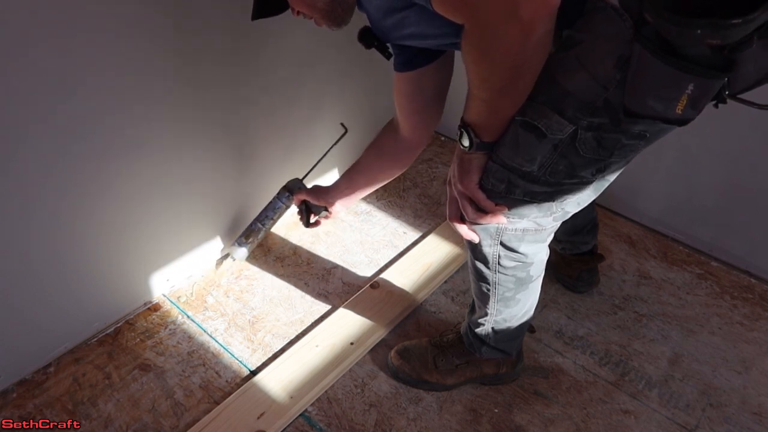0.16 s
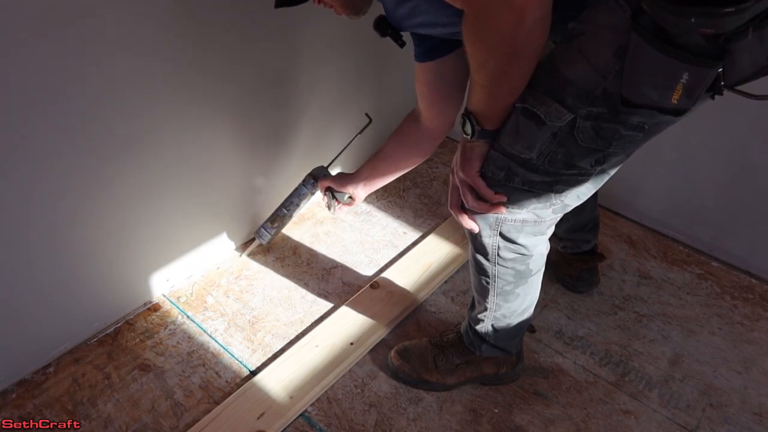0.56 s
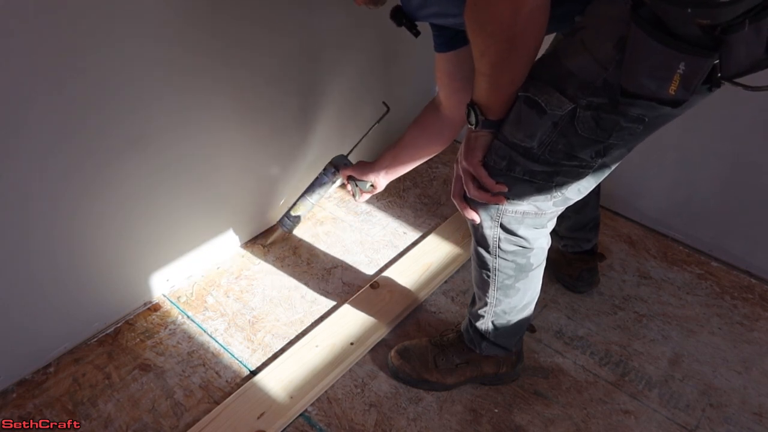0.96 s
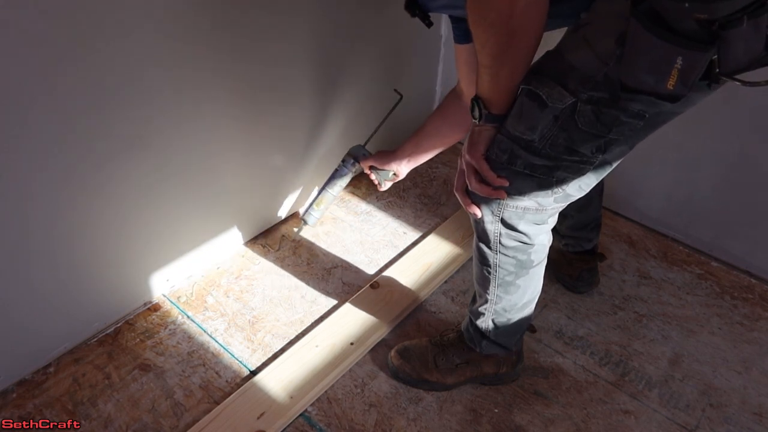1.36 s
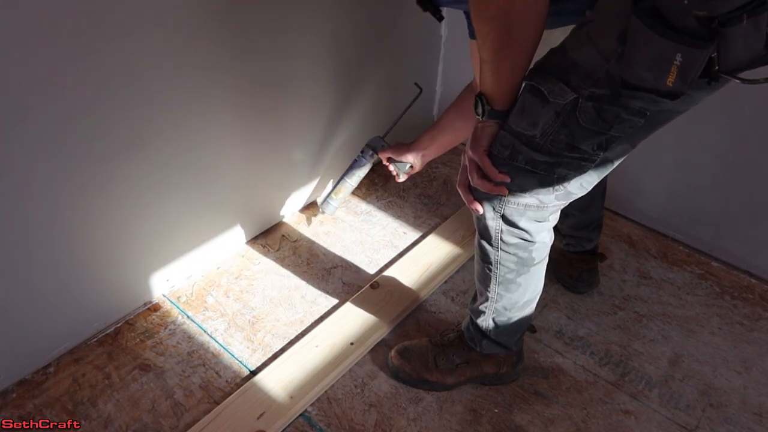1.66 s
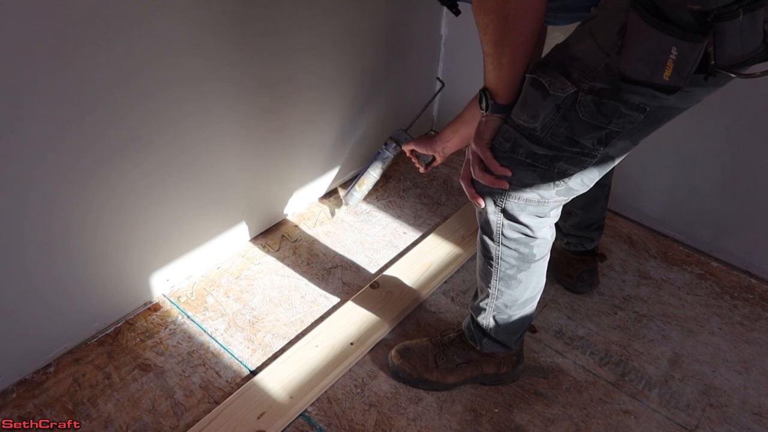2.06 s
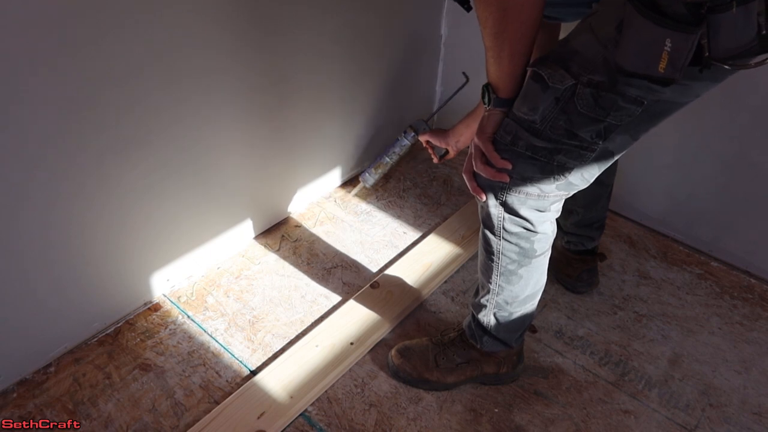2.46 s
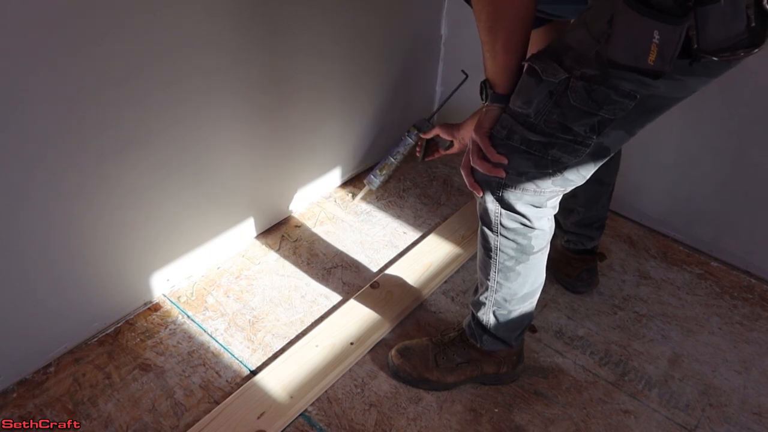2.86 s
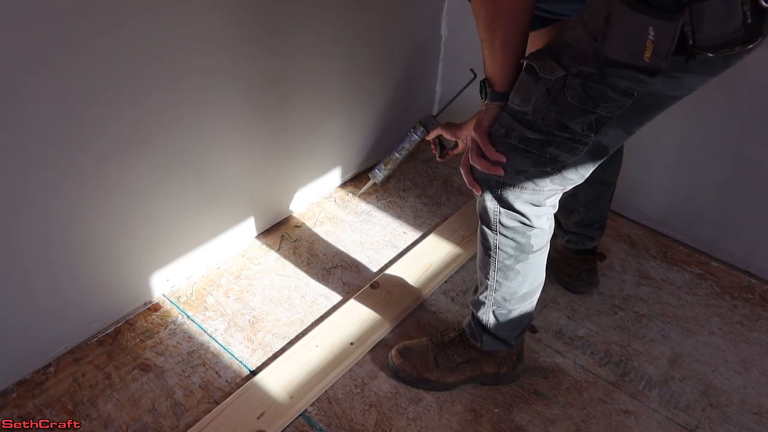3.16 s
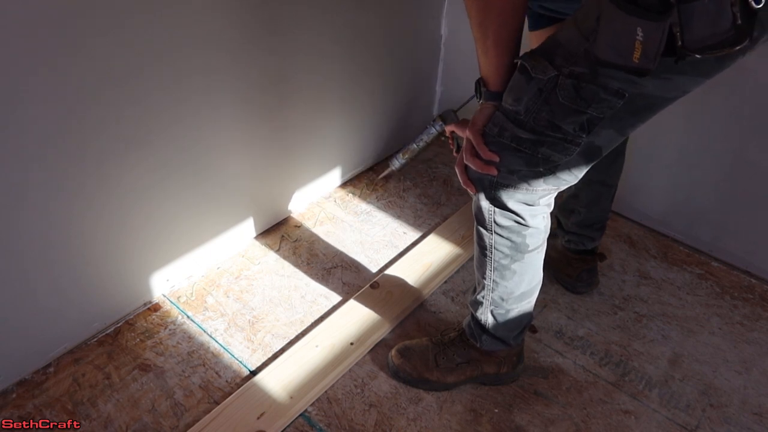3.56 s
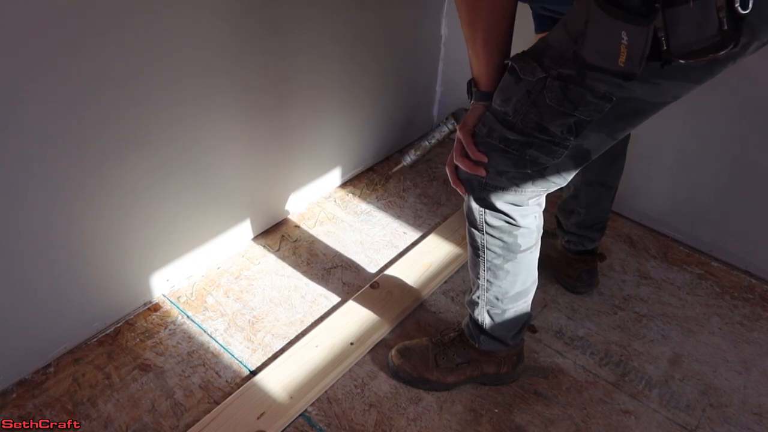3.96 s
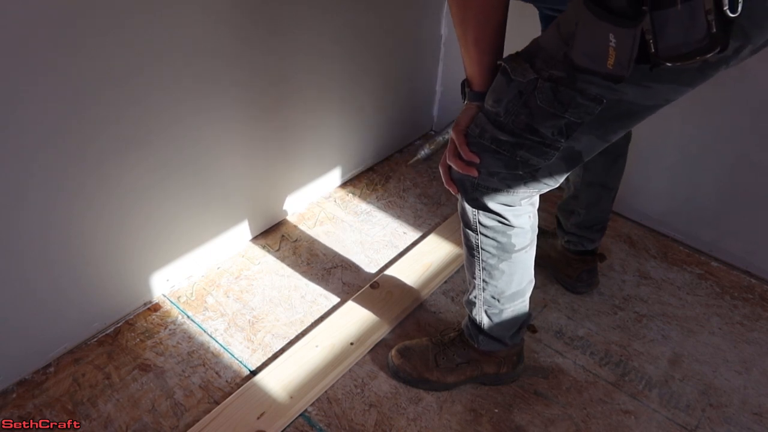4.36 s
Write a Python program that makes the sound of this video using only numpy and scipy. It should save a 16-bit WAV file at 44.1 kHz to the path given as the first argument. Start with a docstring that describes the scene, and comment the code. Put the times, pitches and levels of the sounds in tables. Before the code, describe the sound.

Short hollow, gritty squeezes of a caulking gun, broken by bright metallic clicks and soft taps that echo briefly off bare walls.

```python
"""In a small bare room with a wooden floor, a hand caulking gun is pumped again and again.
Each squeeze makes the rod stick and slip, which excites resonances of tube, rod, cradle and grip plate.
Now and then steel parts snap: short noise bursts shaped by frame modes, some followed by narrow-band rings.
Soft knocks excite board and tube modes; knocks and snaps are answered by a decaying diffuse room tail.
Shaped noise adds rubbing hiss, floor rumble, one scrape and a quiet background; tiny ticks add grit."""
import sys
import numpy as np
from scipy import signal
from scipy.fft import rfft, irfft, next_fast_len
from scipy.io import wavfile
from scipy.ndimage import uniform_filter1d, map_coordinates

SR = 44100
rng = np.random.default_rng(int(sys.argv[2]) if len(sys.argv) > 2 else 0)


def unload_wav(signal):
    """Save mono or channel-first audio to the path in sys.argv[1] as 16-bit WAV at rate SR, clipped to [-1, 1]."""
    wavfile.write(
        sys.argv[1],
        SR,
        np.round(np.clip(np.atleast_2d(signal).T, -1, 1) * 32767).astype(np.int16),
    )


N = 199331

# Steel snaps and ticks; the rows at 0.474 and 0.485 s are faint echoes of the hit at 0.46 s from the walls. #
# Each row: start in seconds, relative level in dB, low-band tilt in dB, # high-band tilt in dB, chatter time in
# seconds, loudest ring in Hz, next ring in Hz.
STEEL_SNAPS = [(0.06, -61.5, -8, -10, 0.004, 1780, 3210), (0.121, -54.5, -6, -11, 0.0046, 4520, 2010),
               (0.188, -49.5, 12, -4, 0.0037, 2070, 4150), (0.246, -57, -6, -6, 0.009, 2080, 4520),
               (0.257, -53, 6, 0, 0.004, 3570, 1420), (0.325, -65, -27, -16, 0.0059, 4570, 2190),
               (0.357, -65, -9, -11, 0.0047, 4540, 7360), (0.388, -66, -3, -13, 0.004, 4500, 2090),
               (0.451, -55, 0, -27, 0.0026, 3900, 2300), (0.4609, -23.5, -3, -3, 0.0013, 9190, 5400),
               (0.4627, -30, 14.5, -16, 0.0022, 1870, 2700), (0.474, -35, 2, -25, 0.0017, 3360, 4110),
               (0.485, -45.5, 4, -14, 0.0085, 2300, 3350), (0.599, -44.5, 17, -22, 0.0083, 2020, 3140),
               (0.63, -42.5, 7.5, -20.5, 0.0073, 2060, 3000), (0.775, -61, -3, -8, 0.0048, 4494, 2100),
               (0.8689, -31.5, -7, 4.5, 0.0055, 6540, 3880), (0.92, -14.5, -13, -2.5, 0.0044, 7470, 3893),
               (0.9458, -31.5, -6, -1, 0.013, 4670, 6100), (0.962, -32.5, -8.5, -8, 0.0042, 6130, 6900),
               (1.205, -62, -7, -17.5, 0.0039, 4730, 5570), (1.428, -58, -5, -19, 0.007, 4510, 7020),
               (1.5638, -48.5, 4, -29, 0.0058, 2250, 3390), (1.598, -58, 10, -11, 0.0044, 2350, 4050),
               (1.8933, -51.5, 2, -17.5, 0.01, 2490, 3350), (2.2139, -53, 3, -14, 0.011, 2190, 3240),
               (2.2606, -44, 6.5, -8, 0.0059, 3340, 2030), (2.379, -52, 3, -21, 0.0083, 2070, 3330),
               (2.511, -47, 2.5, -7.5, 0.005, 2160, 3650), (2.5425, -50.5, 6, -25, 0.0047, 1300, 3980),
               (2.753, -44, 0, -14, 0.0066, 2080, 5100), (2.759, -40.5, -2, -5, 0.0069, 1960, 3060),
               (2.7737, -31, 2.5, -8, 0.005, 2520, 3420), (2.793, -27.5, -1.5, -1.5, 0.0062, 1580, 2790),
               (2.799, -34.5, 1.5, -9, 0.0045, 1950, 3210), (2.816, -46, 6.5, -15, 0.0038, 1440, 3330),
               (2.827, -40.5, 11, -18, 0.0049, 1480, 4070), (2.834, -40.5, -10, -15, 0.0033, 5490, 2810),
               (2.846, -43, 11, -19.5, 0.004, 6210, 5290), (2.8504, -15.5, -12.5, 0.5, 0.0045, 6160, 5350),
               (2.8684, -41, -10, -3, 0.0015, 5540, 3340), (3.0203, -42.5, 0.5, -18.5, 0.0035, 3370, 5080),
               (3.0542, -46.5, -4.5, -21, 0.0062, 5700, 2950),
               (3.206, -57.5, -2.5, -18, 0.0041, 2860, 3690), (3.3232, -50.5, 3, -28, 0.0095, 2070, 3350),
               (3.3732, -26, -20.5, -3.5, 0.0051, 5730, 4730),
               (3.382, -14.5, -14.5, -1, 0.0045, 5660, 4720), (3.3875, -28, 5.5, -22, 0.0034, 4760, 2860),
               (3.591, -49.5, 4, -5, 0.0061, 2080, 3030), (3.6646, -51, 7.5, -29.5, 0.0054, 2100, 3170),
               (3.739, -50.5, 18, -4, 0.0045, 2390, 3150), (3.7808, -62, -10, -11, 0.0038, 3060, 3770),
               (3.862, -49, 3, -19, 0.01, 2300, 2000), (3.8703, -44, -1.5, -1.5, 0.011, 3050, 1340),
               (3.909, -44, 15.5, -23, 0.0057, 2750, 3400), (4.026, -54, 2, -8.5, 0.0063, 1300, 2500),
               (4.1342, -51.5, -28, 0, 0.0018, 5080, 7570), (4.146, -61, 4.5, -20, 0.024, 2250, 3000),
               (4.171, -48, -1.5, -30, 0.013, 2330, 4840), (4.191, -42.5, 6.5, -25, 0.003, 2450, 3100),
               (4.1992, -43.5, -4.5, 2, 0.002, 7190, 5000), (4.2115, -41.5, -19, -1, 0.0015, 1300, 7710),
               (4.3227, -47.5, 0.5, -1, 0.0027, 2020, 3480), (4.478, -54.5, 5.5, -12, 0.021, 2990, 2020)]
# Pulls of the trigger. Each row: time of greatest effort in seconds, build-up in seconds, let-go in seconds,
# effort in dB, then the levels over the effort in dB of tube drone, floor rumble, rod, cradle and hiss.
TRIGGER_PULLS = [(0.071, 0.072, 0.15, -58.5, 11, -9, -4.5, -6, -20),
                 (0.269, 0.14, 0.12, -51, 7.5, -12.5, 0, -9.5, -13),
                 (.49, 0.15, 0.083, -55, -14.5, -9, 1.5, -5, -12),
                 (0.648, 0.12, 0.095, -47, 10, -22, 0.5, -9, -14),
                 (0.779, 0.067, 0.14, -60.5, 14.5, 1, -6, -8, -9.5),
                 (0.991, 0.098, 0.12, -47, 12.5, -17.5, -0.5, -16, -9),
                 (1.129, 0.038, 0.095, -63, 14, 1, -2, -11, -12),
                 (1.3, 0.096, 0.093, -49, 8.5, -18.5, -2.5, -12, -9.5),
                 (1.39, .031, 0.1, -64.5, -9.5, 5, 1.5, -6, -11.5),
                 (1.461, 0.065, 0.1, -59.5, 17.5, -4, -8, 4, -9.5),
                 (1.613, 0.059, 0.14, -43.5, -1.5, -16, 1, -13, -13.5),
                 (1.918, 0.024, 0.1, -45, 5.5, -8, -1.5, -17.5, -10.5),
                 (2.09, 0.25, 0.1, -60.5, 8, -15, 0.5, -2, -8),
                 (2.229, 0.056, 0.17, -48.5, -0.5, -20.5, 2, -11.5, -9),
                 (2.418, 0.11, 0.07, -54, 10.5, -11, 1, -2.5, -11.5),
                 (2.551, 0.11, 0.1, -46, -6, -30, -4.5, -8, -9),
                 (2.68, 0.041, 0.17, -61.5, 4.5, 0, -5.5, -7, -9),
                 (2.801, 0.1, 0.098, -54, -4, -12, 0.5, -6.5, -8.5),
                 (3.1, 0.16, 0.067, -65.5, 1, -9.5, 1, -8, -5),
                 (3.26, 0.021, 0.16, -66, -0.5, -12, -4, -11.5, -5.5),
                 (3.37, 0.14, 0.28, -54, 1, -11.5, -2.5, -11, -9.5),
                 (3.499, 0.12, 0.047, -55.5, -9.5, 2, 2, -2.5, -10.5),
                 (3.64, 0.068, 0.12, -46, 0, -11, -3.5, -5, -10),
                 (3.743, 0.02, 0.06, -50.5, 0.5, -0.5, -0.5, -5, -11),
                 (3.91, 0.056, 0.16, -46, 8, -7, 2.5, -11.5, -12),
                 (4.049, 0.03, 0.083, -62.5, 5, 16, 2, -9, -13.5),
                 (4.208, 0.051, 0.16, -45, 8.5, 6.5, -0.5, -19, -10.5),
                 (4.39, 0.072, 0.052, -59, 6.5, 0.5, -7.5, -4, -6.5),
                 (4.501, 0.077, 0.18, -55, 11, -3, 2, -16, -6.5)]
# Main resonances of the cartridge tube. Each row: centre in Hz, width in Hz, relative level in dB.
TUBE_MODES = [(330, 30, -17), (379, 16, -9), (460, 18, 0)]
# Upper resonances of the cartridge tube. Each row: centre in Hz, width in Hz, relative level in dB.
UPPER_TUBE_MODES = [(494.4, 12, -3.5), (517, 16, 0), (545.6, 30, -1.5), (575.3, 7, -2), (635.2, 11, -6.5),
                    (706.5, 43, -11)]


def amp(db):
    """Amplitude ratio of a level in dB: twenty decibels to a factor of ten."""
    return 10 ** (np.asarray(db) / 20)


def unit(x):
    """Normalisation to unit root mean square, so that a gain alone sets the level."""
    return x / np.sqrt(np.mean(x ** 2) + 1e-20)


def along(points, hz):
    """Linear interpolation of (Hz, value) points on a logarithmic frequency axis."""
    point_hz, value = np.transpose(points)
    return np.interp(np.log(hz + 1), np.log(point_hz + 1), value)


def filtered(x, response):
    """Linear filtering: the spectrum is multiplied by a response, given as a function of frequency in Hz."""
    size = next_fast_len(len(x) + 8192)
    spectrum = rfft(x, size) * response(np.fft.rfftfreq(size, 1 / SR))
    return irfft(spectrum, size)[:len(x)]


def resonant(x, modes):
    """Modal superposition: damped second-order resonances (Hz, width, dB) add with alternating sign."""
    def response(f):
        total = 0
        for k, (centre, width, db) in enumerate(modes):
            damping = 1j * f * width
            total = total + (-1) ** k * amp(db) * damping / (centre ** 2 - f ** 2 + damping)
        return total
    return filtered(x, response)


def bump(f, hz, width, up_db):
    """Lorentzian line: the gain of a spectral peak falls off with the square of the detuning."""
    return amp(up_db) / (1 + ((f - hz) / width) ** 2)


def coloured(x, spectrum):
    """Spectral shaping of a signal by a (Hz, dB) curve."""
    return filtered(x, lambda hz: amp(along(spectrum, hz)))


def judder(rate_hz, spread_db, smooth):
    """Stick-slip friction: random impulses of scattered size over smooth rubbing noise."""
    chance, size, rub = rng.random(N), rng.standard_normal(N), rng.standard_normal(N)
    slips = (chance < rate_hz / SR) * amp(spread_db * np.clip(size, -2, 2)) * np.sign(rub)
    return unit(slips) + smooth * rub  # smooth: rms of the rub relative to the slips


def patchy(x, patchy_db):
    """Unsteady coupling: the grip shifts, so resonances come and go in random time-frequency patches."""
    # partial levelling of slow loudness swings: exponent on short-time power, window in s
    levelling, window_s = 0.43, 0.07
    z = signal.stft(x, nperseg=2048)[2]
    field = uniform_filter1d(rng.standard_normal(z.shape), size=5, axis=0)
    field = uniform_filter1d(field, size=3, axis=1)
    x = unit(signal.istft(z * amp(patchy_db * unit(field)), nperseg=2048)[1][:N])
    power = uniform_filter1d(x ** 2, size=int(window_s * SR))
    power = np.abs(uniform_filter1d(power, size=int(window_s * SR / 2)))
    return unit(x / (power + .02) ** (levelling / 2))


def pulls(over_db, steep):
    """Effort envelope: every pull swells to its peak and lets go, and the powers of the pulls add."""
    swing_db = 23  # rise over the build-up and fall over the let-go, at steepness 1
    sudden_start, round_top = 1.235, 1.11  # exponents of build-up and let-go; 1 = a pointed peak
    step = 64  # samples between envelope points
    s, up, down, effort_db = np.transpose(TRIGGER_PULLS)[:4, :, None]
    late = np.arange(0, N + step, step) / SR - s
    rise, fall = np.abs(late / up) ** sudden_start, np.abs(late / down) ** round_top
    below_db = steep * swing_db * np.where(late < 0, rise, fall)
    power = amp(effort_db + np.reshape(over_db, (-1, 1)) - below_db) ** 2
    return np.interp(np.arange(N) / step, np.arange(late.shape[1]), np.sqrt(power.sum(axis=0)))


def walls(swell_s):
    """Diffuse reverberation: a noise tail swells in, then each frequency decays at its own rate."""
    # Reverberation of the room. Each row: frequency in Hz, time to fall by 60 dB in seconds.
    room_t60 = [(200, 0.99), (1000, 0.59), (3000, 0.36), (6000, 0.35), (10000, 0.31), (15000, 0.4)]
    hz, t, z = signal.stft(rng.standard_normal(SR // 2), SR, nperseg=256)
    lumps_db = 5 * rng.standard_normal(len(t)) * np.exp(-t / 0.026)  # early echoes still come singly
    decay_db = -60 * t / along(room_t60, hz)[:, None]
    tail = signal.istft(z * amp(lumps_db + decay_db), SR, nperseg=256)[1]
    tail = tail * np.clip(np.arange(len(tail)) / SR / swell_s, 0, 1) ** 3
    return tail / np.linalg.norm(tail)


def air():
    """Stationary random noise: the steady, quiet noise of room and microphone."""
    # Quiet room and microphone noise. Each row: frequency in Hz, relative level in dB per Hz.
    air_spectrum = [(24, -55), (45, -16), (200, -10), (330, -8.5), (450, -8.5), (600, -17), (983, -22.5),
                    (1340, -17), (1630, -18), (1970, -18), (2570, -23), (3690, -23), (6740, -29),
                    (12600, -41), (16400, -78), (22000, -120)]
    return amp(-67) * unit(coloured(rng.standard_normal(N), air_spectrum))


def rumble():
    """Low-frequency random vibration: the floor rumbles in step with the effort."""
    # Rumble of the floor. Each row: frequency in Hz, relative level in dB per Hz.
    rumble_spectrum = [(24, -77.5), (60, -56), (100, -20), (135, -3.5), (162, 1), (190, -10.5), (250, -22),
                       (380, -40), (640, -120)]
    rumble_db = np.transpose(TRIGGER_PULLS)[5]
    noise = coloured(rng.standard_normal(N), rumble_spectrum)
    return pulls(rumble_db, steep=0.89) * patchy(noise, patchy_db=9)


def grit():
    """Random damped oscillations: tiny scattered ticks of the rod, louder under effort."""
    ticks_per_s, life_cycles = 50, 2.5  # life: cycles to fall by a factor of e squared
    when, pitch, size = rng.random((int(ticks_per_s * N / SR), 3)).T
    hz, t = 2500 * 3.5 ** pitch[:, None], np.arange(300) / SR
    strength = amp(-4.5 * np.log(size[:, None] + .05))
    envelope = t * hz * np.exp(-2 * t * hz / life_cycles)
    ticks = strength * envelope * np.sin(2 * np.pi * hz * t)
    at = (when[:, None] * N).astype(int) + np.arange(len(t))
    return pulls(-23, steep=0.4) * np.bincount(at.ravel(), ticks.ravel(), N + len(t))[:N]


def scrape():
    """Dry friction: the released trigger scrapes along the rod, a short gritty rub of steel on steel."""
    # Colour of the scrape. Each row: frequency in Hz, relative level in dB per Hz.
    scrape_spectrum = [(600, -21.5), (1500, -4.5), (3500, -4.5), (8000, -10), (15000, -25.5), (22000, -120)]
    centre_s, half_s = 2.79, 0.048  # half_s: from the centre to a fall by a factor of e
    u = (np.arange(N) / SR - centre_s) / half_s
    rub = unit(coloured(judder(rate_hz=250, spread_db=0, smooth=.35), scrape_spectrum))
    return amp(-50) * np.exp(-u ** 4) * rub


def knocks():
    """Impact excitation: soft low-passed blows of the nozzle ring the modes of board and tube."""
    # Dull knocks of the nozzle on the boards. Each row: start in seconds, relative level in dB.
    nozzle_knocks = [(.058, -42), (.08, -44), (.192, -35), (0.404, -44.5), (0.46, -25.5), (.604, -43.5),
                     (.769, -44), (.92, -35), (0.967, -42.5), (1.002, -30), (1.082, -50), (1.128, -54),
                     (1.224, -48), (1.308, -34), (1.44, -38), (1.462, -44), (1.566, -31.5), (1.597, -29.5),
                     (1.61, -31.5), (1.828, -44.5), (1.887, -36), (1.923, -47), (2.205, -32),
                     (2.529, -32.5), (2.731, -47), (2.758, -34.5), (2.8, -38.5), (2.815, -37.5),
                     (2.852, -45), (3.023, -48.5), (3.231, -50.5), (3.325, -41), (3.45, -31),
                     (3.489, -28.5), (3.609, -34), (3.671, -30.5), (3.741, -32.5), (3.872, -34.5),
                     (3.897, -49.5), (4.172, -34.5), (4.395, -46), (4.467, -39)]
    # Resonances of the floor board. Each row: centre in Hz, width in Hz, relative level in dB.
    board_modes = [(260, 52, -4.5), (368, 300, 4.5), (615, 59, 12.5), (883, 190, 5), (1219, 270, -3.5)]
    blows = np.zeros(N + SR)
    for s, db in nozzle_knocks:
        start, answer = round(s * SR), walls(swell_s=0.019)
        blows[start:][:len(answer)] += amp(db + 17) * answer
        blows[start] += amp(db + 25.5)
    blows = filtered(blows[:N], lambda f: 1 / (1 + 1j * f / 1300) ** 2)  # a plastic tip gives way
    # a small tip moves little air in the bass
    blows = filtered(blows, lambda f: (1j * f / 170 / (1 + 1j * f / 170)) ** 2)
    return resonant(blows, board_modes) + 0.59 * resonant(blows, TUBE_MODES + UPPER_TUBE_MODES)


def rings():
    """Beating of close modes: each cluster is a rough narrow noise band that swells, then decays."""
    # The catch plate after a snap. Each row: centre in Hz, width in Hz, level relative to the snap in dB.
    catch_modes = [(3282, 230, -30), (4670, 200, -25.5), (5400, 170, -30.5), (6330, 1100, -30.5),
                   (7900, 1500, -28)]
    # One clink on another steel part. Each row: centre in Hz, width in Hz, level in dB.
    clink_modes = [(9240, 350, -45), (8600, 350, -51), (5000, 600, -48.5), (3510, 1200, -43),
                   (2050, 640, -42.5)]
    clink_s, clink_dies = .461, 0.78  # start in s; decay time relative to the catch plate
    ref_hz, ref_t60 = 5013, 0.39  # a catch-plate ring at this pitch falls by 60 dB in this time (s)
    waver_db = 3  # close modes beat, so a ring comes in lumps
    out, t = np.zeros(N + SR), np.arange(SR // 2) / SR
    blows = [(s, db, catch_modes, best_hz) for s, db, *_, best_hz, _ in STEEL_SNAPS
             if db > -40 and abs(s - clink_s) > .03]  # only the stronger snaps ring
    blows.append((clink_s, 0, clink_modes, None))
    for s, blow_db, modes, best_hz in blows:
        for hz, width, db in modes:
            t60 = ref_t60 * np.sqrt(ref_hz / hz)  # higher modes die sooner
            near_db = 0
            if best_hz:
                near_db = 4 - 16 * min(abs(np.log2(hz / best_hz)), .45)  # modes near the struck ring get most
            else:
                t60 = t60 * clink_dies
            band = unit(filtered(rng.standard_normal(len(t)), lambda f: bump(f, hz, width, 0)))
            waver = amp(waver_db * unit(uniform_filter1d(rng.standard_normal(len(t)), size=500)))
            swell = 1 - np.exp(-t / 0.02)  # rises with the first echoes
            decay = amp(blow_db + db + near_db - 60 * t / t60)
            out[round(s * SR):][:len(t)] += decay * swell * band * waver
    return out[:N]


def snaps():
    """Impact of hard bodies: a contact chatters for some ms, coloured by frame modes, and fills the room."""
    # The steel frame colours every contact. Each row: centre in Hz, width in Hz, relative level in dB.
    frame_modes = [(1840, 130, 0.5), (2890, 250, 4.5), (3830, 240, 1), (4840, 110, 1.5), (5667, 310, 4),
                   (6300, 250, -2.5), (7350, 660, -2.5), (8510, 240, -2.5), (10460, 380, 0),
                   (13000, 400, 0.5)]
    room_db, room_loss = -10.5, 0.13  # room at a 0 dB snap; sharp loud snaps aim more at the microphone (dB/dB)
    treble_per_db = 0.37  # top treble level per dB of snap level
    favour_db, favour_width_hz = 2.5, 95  # the two rings a blow finds best
    between = 0.26  # gain between rings
    soft_rise_s, softer_per_db = 0.00012, 0.2459  # rise of a 0 dB snap; weak ones start more gently (dB/dB)
    room_dull_hz = 11700  # the walls swallow the treble above this
    out, t = np.zeros(N + 2 * SR), np.arange(SR // 8) / SR
    for s, db, low_db, high_db, chatter_s, *best_hz in STEEL_SNAPS:
        top_db = high_db + treble_per_db * db
        slope = [(100, low_db - 45), (400, low_db - 18.5), (1000, low_db - 9.5), (1400, low_db + 6.0),
                 (3000, low_db + 5.5), (4200, 0.02), (7500, 0.24 * high_db), (9500, high_db),
                 (13000, top_db - 2), (16000, top_db - 15.5)]
        struck_db = 2.5 * rng.standard_normal(len(frame_modes))  # each blow finds the modes differently

        def broad(f):
            frame = sum(bump(f, hz, w, level + d - 11) for (hz, w, level), d in zip(frame_modes, struck_db))
            favoured = sum(bump(f, hz, favour_width_hz, favour_db) for hz in best_hz)
            return amp(along(slope, f)) * (between + frame + favoured)

        noise, long_s = rng.standard_normal((2, len(t))), max(chatter_s, .0005)
        rise = 1 - np.exp(-(t / (soft_rise_s * amp(-softer_per_db * db))) ** 2)
        shape = np.exp(-(t / long_s) ** 1.8) + 0.28 * np.exp(-t / 0.0079)
        shaped = filtered(noise[0], broad) * shape
        level = np.linalg.norm(shape) / np.linalg.norm(shaped)  # the filter leaves the strength alone
        hit = level * shaped
        touch = filtered(noise[1], lambda f: bump(f, 12000, 2500, top_db + 3))
        touch = touch * amp(-60 * t / .016)  # the first touch is brightest
        echo = filtered(walls(swell_s=0.018), lambda f: broad(f) / (1 + (f / room_dull_hz) ** 4))
        wet_gain = amp(room_db - room_loss * db) * np.sqrt(long_s * SR)
        wet = wet_gain * echo * np.std(level * noise[0])
        start = round(s * SR)
        out[start:][:len(t)] += amp(db - 1.5) * rise * (hit + touch)
        out[start:][:len(wet)] += amp(db - 2.5) * wet
    return out[:N]


def hiss():
    """Broadband friction noise: dense small slips hiss with the effort, and the level flickers."""
    # Rubbing hiss. Each row: frequency in Hz, relative level in dB per Hz.
    hiss_spectrum = [(1470, -30), (2500, 4), (2670, -8.5), (3410, -1.5), (4490, -7), (5690, -15.5),
                     (8690, -21.5), (12500, -34), (16200, -63.5), (22000, -120)]
    flicker_per_s, flicker_db = 39, 4.5  # random levels per second, their spread
    hiss_db = np.transpose(TRIGGER_PULLS)[8]
    levels = rng.standard_normal(int(N * flicker_per_s / SR) + 4)
    flicker = map_coordinates(levels, [np.arange(N) * flicker_per_s / SR])
    rub = unit(coloured(judder(rate_hz=850, spread_db=3.5, smooth=0.82), hiss_spectrum))
    return pulls(hiss_db, steep=1) * amp(flicker_db * flicker) * rub


def squeeze():
    """Friction-driven resonance: the rod slips through the grip plate and shakes tube, cradle and plate."""
    # The rod under friction. Each row: centre in Hz, width in Hz, relative level in dB.
    rod_modes = [(769, 54, 6), (985, 66, 1), (1020, 60, 4.5), (1180, 73, 1), (1255, 40, 4), (1383, 60, 0),
                 (1517, 150, -6)]
    # The cartridge cradle. Each row: centre in Hz, width in Hz, relative level in dB.
    cradle_modes = [(352, 57, 1), (237, 6.6, -12.5)]
    # The squealing grip plate. Each row: centre in Hz, width in Hz, relative level in dB.
    plate_modes = [(1938, 180, 0.5), (2335, 190, -6)]
    drone_db, _, rod_db, cradle_db, _ = np.transpose(TRIGGER_PULLS)[4:]
    upper_db = 1.8 + 0.18 * (drone_db - drone_db.mean())  # upper modes take on part of the drone's strength
    slips = judder(rate_hz=200, spread_db=2.5, smooth=0.88)  # the walls blur most slips into a smooth rub
    slips = filtered(slips, lambda f: 1 / (1 + 1j * f / 2800) ** 2)  # paste damps the sharp edge of each slip
    # each part: level over the effort in dB, steepness of swell, modes
    parts = [(drone_db, 0.84, TUBE_MODES), (upper_db, 0.67, UPPER_TUBE_MODES), (rod_db, 0.85, rod_modes),
             (cradle_db, 0.47, cradle_modes), (-5, 0.86, plate_modes)]
    return sum(pulls(over_db, steep) * patchy(resonant(slips, modes), patchy_db=4.5)
               for over_db, steep, modes in parts)


def scene():
    """Superposition: the pressures of all sources add at one microphone."""
    background = air() + rumble() + grit() + scrape()
    impacts = knocks() + rings() + snaps()
    return (background + impacts + hiss() + squeeze())[None]


def record(dry):
    """Band limitation: the microphone drops the deep bass, and nothing is kept above the top frequency."""
    top_hz, bass_hz = 16800, 35

    def response(hz):
        treble = np.clip((top_hz - hz) / 700, 0, 1) ** 2
        return treble * hz ** 2 / (hz ** 2 + bass_hz ** 2)
    return filtered(dry[0], response)[None]


dry = scene()
out = record(dry)
unload_wav(out)
```